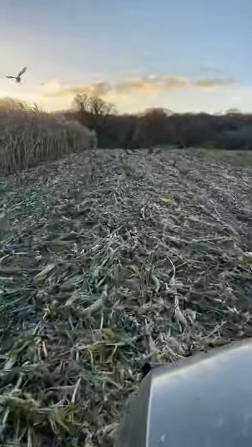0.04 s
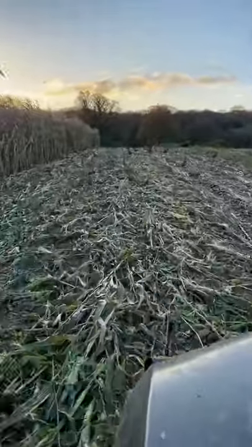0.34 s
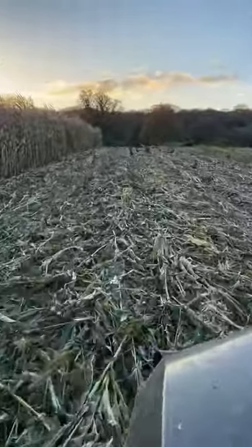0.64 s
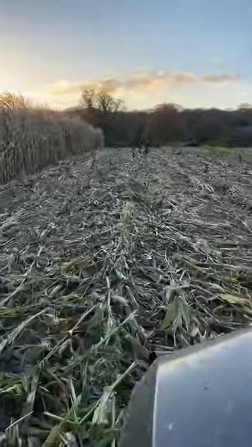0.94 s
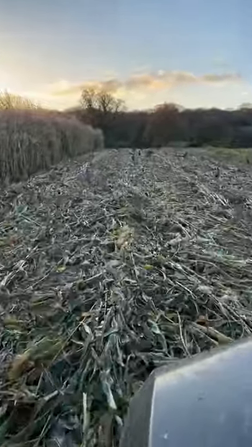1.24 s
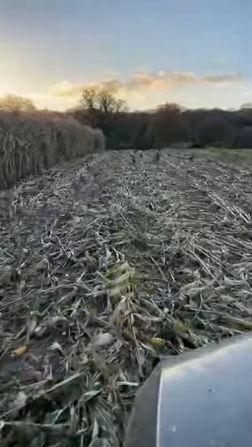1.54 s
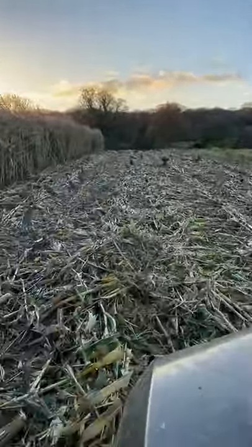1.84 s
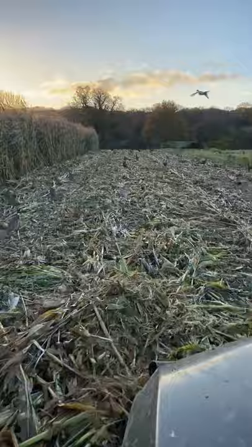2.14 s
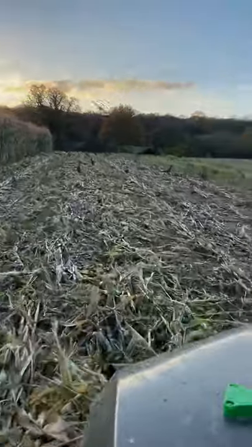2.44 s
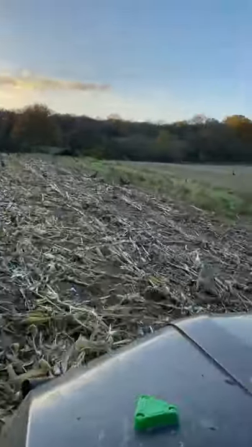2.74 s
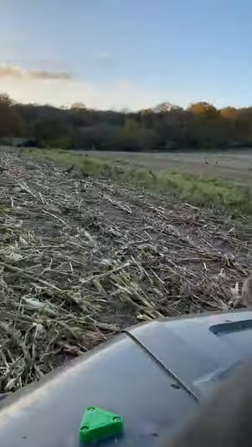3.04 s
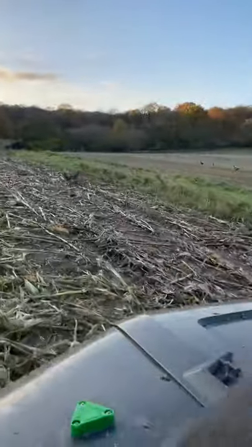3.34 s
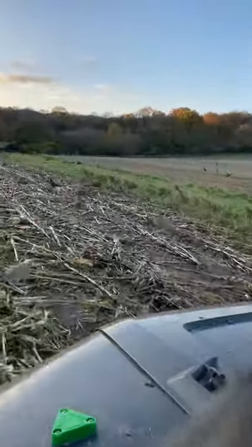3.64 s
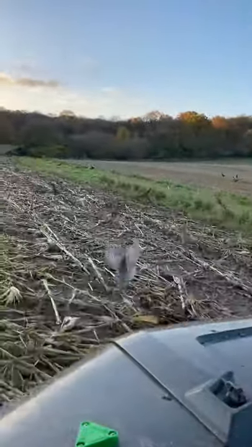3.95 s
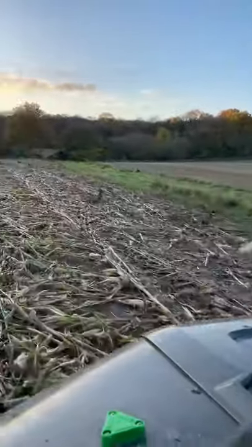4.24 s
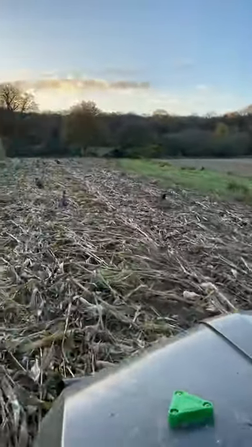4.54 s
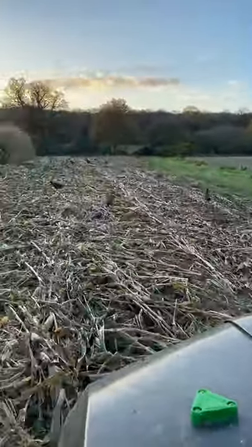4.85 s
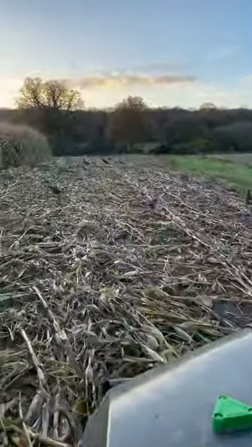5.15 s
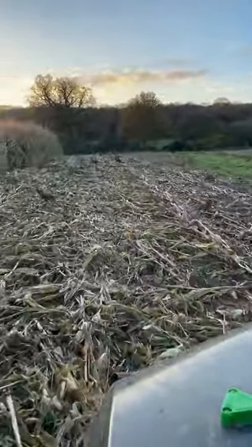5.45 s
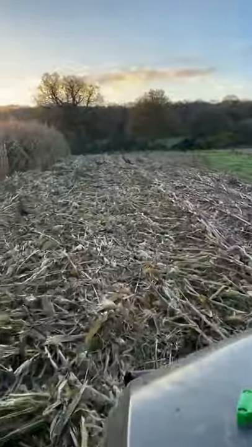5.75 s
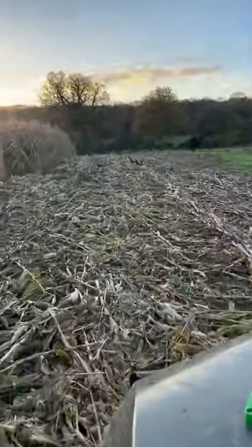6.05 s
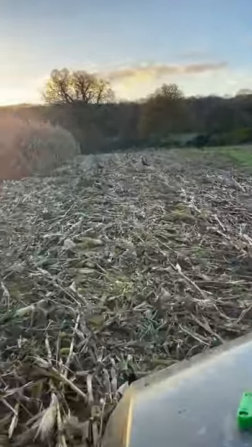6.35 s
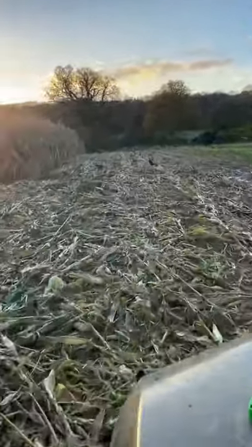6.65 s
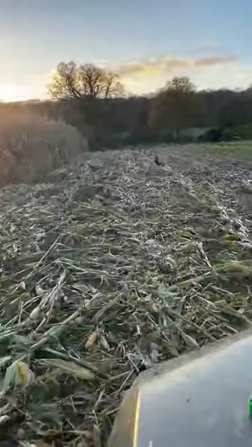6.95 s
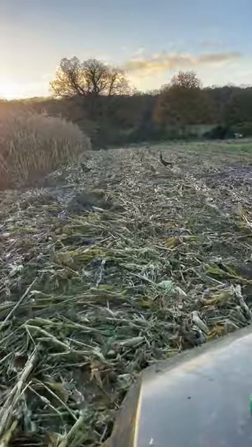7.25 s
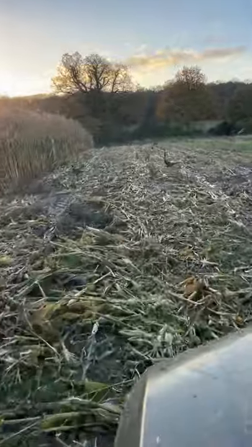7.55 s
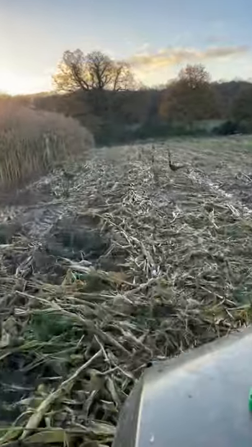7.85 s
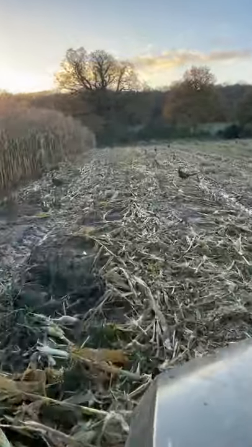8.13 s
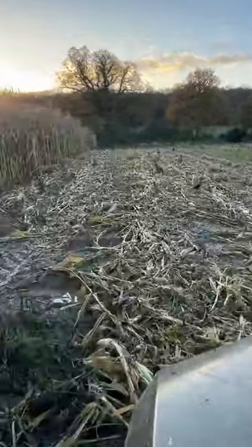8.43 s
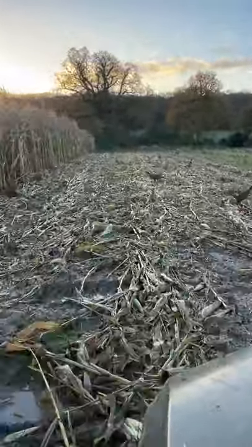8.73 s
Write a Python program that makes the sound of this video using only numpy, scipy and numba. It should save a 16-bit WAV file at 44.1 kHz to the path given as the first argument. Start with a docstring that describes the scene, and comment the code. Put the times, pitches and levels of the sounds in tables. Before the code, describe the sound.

Wind thuds and sputters on a microphone riding in the open cab of a small farm vehicle, over a steady, low engine drone. As the gusts ease, the wheels bump through ruts in the field with dull knocks and deep rumbles, and the engine slows a little. Maize stalks crackle underneath throughout, with occasional sharp snaps. A faint whine rises late on, and hard gusts come back.

```python
"""Gusts buffet the microphone over the drone of a small three-cylinder utility vehicle, heard from its
open cab as it crosses flattened maize. The exhaust sounds harmonics of the engine cycle under valve
clatter, and ruts set the body rumbling and the chassis ringing. Stalks fracture under the tyres in a
fine crunch and single snaps. The wind, turbulent pressure at the microphone's two ports, dies away
after two seconds and returns near the end."""
import sys
import numpy as np
from scipy import signal
from scipy.fft import rfft, irfft
from scipy.io import wavfile
from scipy.ndimage import uniform_filter1d, minimum_filter1d
from numba import njit

SR = 44100
rng = np.random.default_rng(int(sys.argv[2]) if len(sys.argv) > 2 else 0)


def log_audio(samples):
    """Write samples as a 16-bit WAV file to the path given in sys.argv[1]."""
    # one column per channel
    frames = np.atleast_2d(samples).T
    # limit to full scale, then quantise
    limited = np.clip(frames, -1, 1)
    pcm = np.round(limited * 32767).astype(np.int16)
    wavfile.write(sys.argv[1], SR, pcm)


N = 396459
T = np.arange(N) / SR
BIN_HZ = np.arange(N // 2 + 1) * SR / N

# Phase between the two ports for sound from the vehicle: frequency_hz, phase_rad
PORT_PHASE = [(0, 0), (100, .12), (380, .3), (520, 1.2), (780, 2.1), (1200, 1.8), (1800, .1), (3000, 1),
              (5000, .5), (6300, 1.5), (7100, 2.9), (7900, 3.4), (10500, 6.2), (13000, 9), (14400, 9.8),
              (15500, 11.3)]
# Gain of the bass difference between the channels: time_s, gain_db
BASS_WIDTH = [(0, 7.5), (2.7, 8), (3.4, 2), (4.3, -3), (4.8, -21), (5.6, -48), (6.1, -58), (7.2, -61),
              (7.8, -52), (9, -47)]
# Excess of the left channel over the right: time_s, difference_db
BALANCE = [(0, 0.28), (2.7, 0.2), (4.5, 0), (5, 0)]

# Hollow low-mid noise around 600-900 Hz that swells and fades: time_s, level_db
HOLLOW_NOISE = [(0, -51), (2, -33.5), (2.15, -36), (2.6, -38), (2.8, -46), (3.05, -34), (3.2, -27),
                (3.35, -32.5), (4, -31.5), (4.6, -40), (5.3, -42), (5.7, -45), (6.1, -39), (6.8, -33.5),
                (7.5, -39), (9, -45)]
# Deep rumble that swells around the times of gusts and jolts: time_s, level_db
DEEP_RUMBLE = [(0, -19), (.6, -30), (.85, -19), (1.1, -30), (1.9, -18.5), (2.2, -29), (3.1, -31),
               (3.5, -39), (4.7, -43), (5, -12.5), (5.2, -43), (5.75, -28), (5.93, -11), (6.1, -26),
               (7, -31), (7.25, -23.5), (7.7, -31), (8.2, -21), (8.45, -12.5), (8.6, -20), (9, -17)]
# Spectra of the hollow noise and the deep rumble: frequency_hz, relative_db
HOLLOW_SPECTRUM = [(300, -8), (600, 4), (750, -4), (860, 4), (1050, -9.5), (1400, -14.5), (3000, -44)]
DEEP_SPECTRUM = [(15, -32), (35, -17), (52, -4.5), (64, 0), (85, -10), (200, -42), (1000, -100)]

# Light air on the microphone, sheltered in mid-drive: time_s, level_db
BREEZE = [(0, -32), (2.05, -33), (2.15, -70), (6.8, -53), (7.7, -43), (9, -26.5)]
# Gusts on the microphone: start_s, length_s, level_db
GUSTS = [(.24, 0.055, -27), (.78, 0.024, -25), (.91, 0.073, -26.5), (1.28, 0.06, -24.5),
         (1.587, 0.038, -21.5), (1.66, 0.14, -24), (1.875, 0.1, -23), (2.025, 0.05, -24.5),
         (7.69, 0.13, -31), (7.975, 0.054, -20.5), (8.42, 0.023, -27), (8.456, 0.052, -16.5),
         (8.52, 0.035, -19), (8.64, .13, -27), (8.785, 0.02, -18), (8.825, 0.13, -20.5)]
# The strongest eddies: centre_s, level_db, core_hz, core_half_width_cycles
EDDIES = [(.031, -7, 610, 0.69), (.1585, -7, 720, 1.37), (.189, -14.5, 476, 2.5), (.252, -21, 1040, 1.5),
          (.264, -29, 1150, 1.7), (.271, -2, 630, 1.5), (.28, -11, 720, 2), (.558, -17, 690, 2.4),
          (.715, -8, 550, 0.95), (.7213, -6.5, 900, 1.56), (.795, -12, 1110, 1.84), (.801, -7.5, 1020, 2.1),
          (.806, -3, 520, 1.1), (.852, -14.5, 1090, 1.25), (.877, -15, 750, 1.74), (.923, -13.5, 806, 2.6),
          (.944, -17, 800, 1.3), (1.215, -12.5, 535, 2.1), (1.281, -15, 615, 1.2), (1.302, -16, 704, 1.8),
          (1.319, -14, 900, 2.9), (1.328, -5.5, 640, 1.9), (1.343, -13, 800, 1.5), (1.516, -10, 1020, 4.44),
          (1.5858, -8.5, 1193, 3), (1.59, -6, 1530, 2.2), (1.604, -7, 760, 2), (1.615, -4, 1340, 2.04),
          (1.681, -11, 850, 2.2), (1.739, -6, 1170, 3.6), (1.759, -13, 1200, 2.4), (1.8275, -5.5, 750, 1.7),
          (1.8335, -5, 1200, 3.02), (1.91, -13, 1398, 2.8), (1.932, -9, 1680, 4), (1.938, -3, 1020, 3),
          (1.945, -4, 900, 1.8), (2.008, -8, 855, 1.6), (2.033, -10, 1109, 2.34), (2.042, -10, 1270, 3),
          (2.068, -16, 1150, 1.7), (7.085, -12.5, 1320, 1.31), (7.152, -18, 860, 1.8),
          (7.215, -8, 546, 0.79), (7.256, -11, 710, 1), (7.371, -10.5, 615, 1.1), (7.696, -6.5, 754, 1.13),
          (7.731, -11.5, 1214, 2.36), (7.772, -7.5, 444, 0.94), (7.986, -9.5, 845, 2.3),
          (8.026, -4.5, 975, 2), (8.2885, 0, 1060, 1.53), (8.454, -6, 971, 2.63), (8.46, 2, 651.5, 2.3),
          (8.471, -7, 1602, 3.4), (8.495, -9.5, 810, 3.4), (8.541, -15, 1430, 3.1), (8.742, -11, 990, 2.17),
          (8.799, -10, 1128, 3.65), (8.902, -7, 1380, 3.4)]
# Spectra of a gust's thud and of an eddy's spray and churn: frequency_hz, relative_db
THUD_SPECTRUM = [(50, -20), (130, 6.5), (380, -5), (600, -6), (1000, -22), (3000, -74)]
SPRAY_SPECTRUM = [(100, 13.5), (1000, -1), (2200, -7), (4000, -12), (9000, -55)]
CHURN_SPECTRUM = [(80, -8), (200, 1), (450, 1), (800, -10.5), (2000, -48)]

# Steady crackle of stubble under the tyres: time_s, level_db
STUBBLE = [(0, -44), (2.2, -44.5), (2.7, -42.5), (4.2, -44.5), (5.6, -47.5), (7, -44.5), (9, -49)]
# Clumps of stalks being crushed: start_s, length_s, level_db
CLUMPS = [(.78, 0.0082, -40.5), (.91, 0.028, -37.5), (1.92, 0.085, -37), (2.46, 0.16, -37),
          (6.74, 0.095, -43), (7.4, 0.22, -44.5), (7.93, 0.049, -38.5), (8.18, 0.11, -41.5),
          (8.38, 0.019, -34), (8.62, 0.078, -40), (8.79, 0.046, -42.5)]
# Thick stalks breaking: start_s, crack_db, splinter_db
SNAPS = [(.931, -22, -34), (1.039, -19.5, -38), (1.176, -23, -19), (1.459, -24, -24), (1.4968, -24, -24),
         (1.8365, -18, -22), (1.924, -15, -26), (2.357, -23, -34), (2.4708, -14.5, -18), (3.196, -25, -30),
         (4.0558, -26, -27), (4.263, -22.5, -28), (6.235, -30, -28), (6.535, -24.5, -42),
         (6.7507, -19.5, -22), (6.766, -18.5, -30), (6.81, -23, -33), (7.083, -23, -32), (7.356, -22, -33),
         (7.73, -19, -24), (8.067, -20, -32), (8.4, -20, -16)]
# Spectra of crushed fibres, woody cracks and splinters: frequency_hz, relative_db
CRUNCH_SPECTRUM = [(500, -2.5), (1500, -0.5), (2800, -0.5), (4000, -0.5), (5400, 1.5), (6500, -5.5),
                   (8000, -3.5), (10000, -7), (12500, -12.5), (15500, -16.5)]
CRACK_SPECTRUM = [(400, -21), (1200, 6.5), (3000, 4), (5500, -1), (9000, -26), (15500, -31)]
SPLINTER_SPECTRUM = [(1500, -22), (4500, -3), (7500, 3), (11000, -5), (15500, -7)]

# Rolling rumble of tyres and body: time_s, level_db
ROLLING = [(0, -17), (.5, -29), (.8, -18), (1.15, -22), (2, -18.5), (2.1, -36), (2.6, -37), (2.72, -23),
           (3.15, -30), (3.4, -24), (4.7, -23.5), (5.7, -24), (5.9, -22), (6.05, -22.5), (7.1, -24.5),
           (7.55, -24.5), (9, -20.5)]
# Wheels dropping into ruts: start_s, level_db
JOLTS = [(2.73, -13), (3.002, -11), (3.037, -10.5), (3.1, -13.5), (3.19, -10.5), (3.235, -19), (3.769, -18),
         (4.073, -15.5), (4.984, -13), (5.494, -8), (5.872, -6), (5.922, -3.5), (7.151, -14), (7.21, -9),
         (7.252, -7.5)]
# Normal modes of the chassis: pitch_hz, level_db, t60_s
CHASSIS_MODES = [(59.3, -7.5, 0.12), (152, -12, 0.087), (240, 0.5, 0.032), (322.4, -2, 0.041),
                 (507, -3.5, 0.014), (730, -5, 0.016), (1150, -13, 0.026)]
# Spectra of panel rumble and of noise scattered in the cab: frequency_hz, relative_db
RUMBLE_SPECTRUM = [(20, -28), (35, -24), (55, -12.5), (100, 4), (150, 0), (220, -1.5), (340, -8), (450, -8),
                   (580, -10.5), (740, -17), (860, -10.5), (1000, -57), (1500, -53.5)]
SCATTER_SPECTRUM = [(30, 4), (100, -3), (300, 3), (700, 16), (1100, 8), (1700, -6.5), (3000, -7.5),
                    (6000, -21), (15000, -68)]

# Gear whine and bright valve clatter: time_s, level_db
WHINE = [(0, -54), (6.3, -52), (7, -46), (7.7, -41.5), (8.3, -50.5), (9, -57)]
CLATTER = [(0, -36.5), (1, -36.5), (2.15, -37.5), (2.5, -37), (3.7, -34.5), (4.6, -35.5), (5.6, -37),
           (6.7, -37), (7.5, -35.5), (8.2, -36), (9, -40)]
# Spectrum of the clatter: frequency_hz, relative_db
CLATTER_SPECTRUM = [(300, -2), (700, -5), (1050, 5.5), (1300, 4), (1550, 0), (1900, 2.5), (2400, -1.5),
                    (3000, -5), (5000, -12.5), (10000, -23)]
# Engine speed: time_s, firing_hz
FIRING_RATE = [(0, 85.6), (.6, 86), (1.1, 84.8), (1.5, 84.4), (3, 84.4), (3.7, 84.8), (4.4, 84.8),
               (4.8, 83.3), (5.1, 78.3), (5.6, 77), (7, 76.7), (7.8, 75.9), (9, 76.2)]
# Level of the low drone as heard, dropping out briefly under wind buffets: time_s, level_db
DRONE = [(0.0, -11), (0.8, -9.5), (0.82, -23), (0.87, -11), (0.97, -18.5), (1.02, -13), (1.7, -14.5),
         (2.35, -9.5), (3.3, -10), (4.83, -6.5), (5.01, -13), (5.06, -8), (7.11, -8.5), (7.31, -14),
         (7.59, -14.5), (7.66, -7.5), (7.86, -15.5), (7.91, -9.5), (8.16, -15), (8.99, -15.5)]
# Gain of the low engine orders under load: time_s, gain_db
LOAD = [(0, -2.5), (2.1, -2.5), (2.6, -4), (3.1, -1.5), (4, 0.5), (4.8, -0.5), (5.3, -4), (6.5, -2.5),
        (7.2, -3.5), (9, -7.5)]
# Harmonics 1, 2, 3... of the four-stroke cycle in the resonant cab, engine fast and slow: level_db
FAST_ORDERS = [-49, -21.5, 0.5, -27, -42, -16.5, -19, -43.5, -27, -30.5, -33, -27.5, -25.5, -48, -36, -35,
               -45, -37, -35.5, -30, -44]
SLOW_ORDERS = [-49, -30, 0, -22, -25, -18, -20, -25.5, -27, -29, -28.5, -26.5, -28.5, -34.5, -29, -39.5,
               -39.5, -33.5, -34.5, -39, -32]


def undb(db):
    """Amplitude grows tenfold for every 20 dB."""
    return 10 ** (np.asarray(db) / 20)


def curve(rows):
    """Linear interpolation of rows (time_s, value) at every sample."""
    return np.interp(T, *np.transpose(rows))


def unit(x):
    """Normalisation to an rms of 1."""
    return x / np.sqrt(np.mean(x ** 2))


def noise():
    """White noise: equal mean power at all frequencies."""
    return rng.standard_normal(N)


def wander(rate_hz):
    """Smooth random modulation of rms 1, drawn anew rate_hz times a second."""
    knots = rng.standard_normal(int(N / SR * rate_hz) + 3)
    joined = np.interp(T * rate_hz, np.arange(len(knots)), knots)
    return unit(uniform_filter1d(joined, max(int(SR / rate_hz / 2), 1)))


def colour(x, spectrum):
    """Spectral shaping that conserves the power of a white input."""
    hz, db = np.transpose(spectrum)
    gain = undb(np.interp(np.log(BIN_HZ + 1), np.log(hz), db))
    return irfft(rfft(x) * unit(gain), N)


@njit
def lowpass(x, cutoff_hz, damping):
    """A damped second-order system attenuates what lies above its moving cutoff."""
    y, band, low = np.empty(len(x)), 0., 0.
    for i in range(len(x)):
        g = np.tan(np.pi * cutoff_hz[i] / SR)
        v = (band + g * (x[i] - low)) / (1 + g * (g + damping))
        y[i] = low + g * v
        band, low = 2 * v - band, 2 * y[i] - low
    return y


def swelling_db(floor, swells, rise_s, fall_s):
    """Incoherent addition: a slow floor and swells (start_s, length_s, level_db) sum in power."""
    power = undb(curve(floor)) ** 2
    for start_s, length_s, db in swells:
        outside = np.maximum(start_s - T, 0) / rise_s + np.maximum(T - start_s - length_s, 0) / fall_s
        power += (undb(db) * np.exp(-np.minimum(outside, 20))) ** 2
    return 10 * np.log10(power)


def ports(direct, diffuse):
    """Phase difference: two ports receive direct sound out of step and diffuse sound in antiphase."""
    half_turn = np.exp(.5j * np.interp(BIN_HZ, *np.transpose(PORT_PHASE)))
    mid, side = rfft(direct), rfft(diffuse)
    return irfft(np.array([mid * half_turn + side, mid / half_turn - side]), N)


def bass_width(pair, edge_hz=260):
    """Width follows the difference between channels: the bass starts wide and narrows to mono."""
    mid, side = (pair[0] + pair[1]) / 2, (pair[0] - pair[1]) / 2
    upper = signal.sosfiltfilt(signal.butter(3, edge_hz, "high", fs=SR, output="sos"), side)
    side = upper + (side - upper) * undb(curve(BASS_WIDTH))
    return np.array([mid + side, mid - side])


def cab_scatter(shake_db):
    """Scattering by the cab's panels leaves a faint noise that rises a little with the shaking."""
    return colour(noise(), SCATTER_SPECTRUM) * undb(-31 + 0.083 * (shake_db - shake_db.mean()))


def hollow_noise(firing, depth=0.035, flicker_db=2):
    """Band-limited noise, weakly modulated at the firing rate, sounds hollow as it swells and fades."""
    flickering = noise() * unit(1 + depth * firing) * undb(flicker_db * wander(60))
    return colour(flickering, HOLLOW_SPECTRUM) * undb(curve(HOLLOW_NOISE))


def deep_rumble():
    """Narrow-band noise near 60 Hz is heard as a deep rumble that comes in swells."""
    return colour(noise(), DEEP_SPECTRUM) * undb(curve(DEEP_RUMBLE))


def turbulence(wind_db):
    """Turbulent pressure at a port: its bandwidth grows with the strength of the flow."""
    force_db = wind_db + 3 * np.minimum(wander(300), 1.8)
    edge_hz = np.clip(790 * undb(0.43 * (force_db + 18)), 200, 1500)
    drive = undb(force_db - 5) * np.sqrt(SR / 2 / edge_hz)  # a narrower band needs more drive
    pressure = lowpass(noise() * drive, edge_hz, 1.12)
    return lowpass(pressure, 3.2 * edge_hz, 0.35)


def lesser_eddies(wind_db, candidates=2000, densest_db=-23, doubling_db=13.5, half_width_cycles=1.14):
    """Random arrivals, as rows like EDDIES: stronger flow brings more, harder and faster eddies."""
    times = (np.arange(candidates) + rng.random(candidates)) / candidates * T[-1]
    size, pace = rng.standard_normal((candidates, 2)).T
    local_db = np.interp(times, T, wind_db)
    levels_db = np.minimum(local_db + 6 + 2.5 * size, -4)
    core_hz = 807 * 2 ** ((levels_db + 11.5) / doubling_db + 0.39 * pace)
    arrives = rng.random(candidates) < undb(local_db - densest_db)
    return [(*row, half_width_cycles) for row in np.column_stack([times, levels_db, core_hz])[arrives]]


def eddies(rows, lead_s=0.0028, wake_s=0.0068, wake_hz=260.2):
    """A passing vortex swings the pressure hard at its core, then slows into a weak wake."""
    out = np.zeros(N)
    swirl = undb(4.5 * np.minimum(wander(1800), 1))  # uneven pace: the swings sputter and never ring
    spray = colour(noise(), SPRAY_SPECTRUM) * undb(-16)
    churn = colour(noise(), CHURN_SPECTRUM) * undb(-13)
    for centre_s, db, core_hz, half_width_cycles in rows:
        centre = int(centre_s * SR)
        near = slice(max(centre - SR // 50, 0), centre + SR // 40)
        age = T[near] - centre_s
        core = np.exp(-(age * core_hz / half_width_cycles) ** 2)
        wake = undb(-4) * np.exp(-np.maximum(-age / lead_s, age / wake_s))
        swing_hz = (wake_hz + (core_hz - wake_hz) * np.sqrt(core)) * swirl[near]
        swing = np.sin(2 * np.pi * (np.cumsum(swing_hz) / SR + rng.random()))
        shed = (core_hz / 900) ** 2 * spray[near]  # fast eddies shed finer turbulence
        out[near] += undb(db - 1) * np.maximum(core, wake) * (swing + churn[near] + shed)
    return out


def wind():
    """Partial coherence: both ports share the buffeting, except for a duller part that differs."""
    wind_db = swelling_db(BREEZE, GUSTS, rise_s=0.0083, fall_s=0.0123)
    buffets = turbulence(wind_db) + eddies(EDDIES + lesser_eddies(wind_db))
    thud = colour(noise(), THUD_SPECTRUM) * undb(wind_db - 4)  # gusts strike the microphone's housing
    common = lowpass(buffets, np.full(N, 3000.), 0.98) + thud
    apart = lowpass(turbulence(wind_db), np.full(N, 900.), 1.0) * undb(-11)
    low_cut = signal.butter(2, 65, "high", fs=SR, output="sos")
    return signal.sosfilt(low_cut, [common + apart, common - apart])


def crunch(crush_db, fibres_per_s=5000):
    """Breaking fibres form a Poisson train of impulses over the rustle of dry leaves."""
    sizes = undb(3 * np.minimum(rng.exponential(size=N), 6))
    fractures = (rng.random(N) < fibres_per_s / SR) * sizes * rng.choice([-1, 1], N)
    litter = unit(unit(fractures) + undb(-1) * noise()) * undb(2 * wander(45))
    return colour(litter, CRUNCH_SPECTRUM) * undb(crush_db + 3.5)


def stalk_snaps(thin_count=24, thin_db=-32, t60_s=0.016):
    """Brittle fracture gives a woody crack and bright splinters; thin stalks break at random times."""
    envelopes, age = np.zeros((2, N)), T[:SR // 4]
    decay = undb(-60 * age / t60_s)
    thin_starts = rng.random(thin_count) * (T[-1] - age[-1])
    thin_stalks = np.column_stack([thin_starts, thin_db + rng.standard_normal((thin_count, 2))])
    for start_s, *levels_db in SNAPS + list(thin_stalks):
        envelopes[:, int(start_s * SR):][:, :len(age)] += np.outer(undb(levels_db), decay)
    crack, splinters = envelopes
    return colour(noise() * crack, CRACK_SPECTRUM) + colour(noise() * splinters, SPLINTER_SPECTRUM)


def chassis_thumps(spread_db=2, contact_s=0.0012):
    """Each drop into a rut excites the damped modes of the chassis in slightly different proportions."""
    out, age = np.zeros(N), T[:SR // 4]
    modes = np.array([undb(db - 60 * age / t60_s) * np.sin(2 * np.pi * hz * age)
                      for hz, db, t60_s in CHASSIS_MODES])
    modes *= 1 - np.exp(-age / contact_s)  # the tyre softens the blow
    for start_s, db in JOLTS:
        weights = undb(db + spread_db * rng.standard_normal(len(modes)))
        out[int(start_s * SR):][:len(age)] += weights @ modes
    return out


def ground_shake_db(hold_s=0.014):
    """Excitation of the body by the ground: steady rolling, with a brief swell at each jolt."""
    swells = [(start_s, hold_s, db - 6.5) for start_s, db in JOLTS]
    return swelling_db(ROLLING, swells, rise_s=0.0072, fall_s=0.0097)


def panel_rumble(firing, shake_db):
    """Forced vibration: tyre lugs and ruts drive the panels, which also shudder at each firing."""
    drive = noise() * unit(1 + 0.55 * firing) * undb(2.6 * wander(45))
    return colour(drive, RUMBLE_SPECTRUM) * undb(shake_db)


def gear_whine(cycles, order=51):
    """Meshing teeth sound a high harmonic of the engine cycle, with slight phase jitter."""
    phase = 2 * np.pi * order * cycles + 0.63 * wander(30)
    return np.sqrt(2) * np.sin(phase) * undb(curve(WHINE))


def valve_clatter(firing, depth=0.035, flicker_db=2):
    """Valve and injector impacts make broadband noise, weakly amplitude-modulated at the firing rate."""
    rattle = noise() * unit(1 + depth * firing) * undb(flicker_db * wander(60))
    return colour(rattle, CLATTER_SPECTRUM) * undb(curve(CLATTER))


def exhaust(cycles, shake_db, fast_hz=84.5, slow_hz=77):
    """Periodic firing gives every third harmonic of the cycle; unequal cylinders add those between."""
    slowed = np.clip((fast_hz - curve(FIRING_RATE)) / (fast_hz - slow_hz), 0, 1)
    partials = []
    for order, (fast_db, slow_db) in enumerate(zip(FAST_ORDERS, SLOW_ORDERS), 1):
        amplitude = undb(fast_db + (slow_db - fast_db) * slowed)
        partials.append(amplitude * np.sin(2 * np.pi * (order * cycles + rng.random())))
    firing_tone = partials.pop(2) * undb(1.2 * wander(25))
    fluttering = [partial * undb(2.4 * wander(12)) for partial in partials]
    low = sum(fluttering[:6]) * undb(curve(LOAD))
    high = sum(fluttering[6:]) * undb(0.79 * (shake_db - shake_db.mean()))
    roughness = undb(2 * wander(60))
    return (firing_tone + (low + high) * roughness) * np.sqrt(2) * undb(curve(DRONE))


def scene():
    """Superposition at two ports of direct sound, diffuse sound and the wind."""
    firing_hz = curve(FIRING_RATE) * (1 + .002 * wander(12))
    cycles = np.cumsum(firing_hz) / SR / 3  # three firings to a four-stroke cycle
    firing = np.cos(2 * np.pi * 3 * cycles)
    shake_db = ground_shake_db()
    crush_db = swelling_db(STUBBLE, CLUMPS, rise_s=0.024, fall_s=0.049)
    direct = exhaust(cycles, shake_db) + valve_clatter(firing) + hollow_noise(firing) + gear_whine(cycles)
    direct += panel_rumble(firing, shake_db) + deep_rumble() + chassis_thumps()
    direct += crunch(crush_db) + stalk_snaps()
    diffuse = cab_scatter(shake_db) + crunch(crush_db) * undb(-8)  # leaves rustle on both sides
    pair = ports(direct, diffuse) + wind()
    balance_db = curve(BALANCE)
    return bass_width(pair * undb(np.array([balance_db, -balance_db]) / 2))


def record(dry, ceiling=0.95, hold_s=0.017, top_hz=15900):
    """Peak limiting ducks everything under the hardest buffets; a steep low-pass bounds the treble."""
    span = int(hold_s * SR)
    allowed_gain = np.minimum(1, ceiling / (np.abs(dry).max(axis=0) + 1e-9))
    gain = uniform_filter1d(minimum_filter1d(allowed_gain, span), span)
    fade_in = np.minimum(T / .002, 1)
    high_cut = signal.ellip(10, .1, 80, top_hz, fs=SR, output="sos")
    return signal.sosfilt(high_cut, dry * gain * fade_in)


dry = scene()
out = record(dry)
log_audio(out)
```